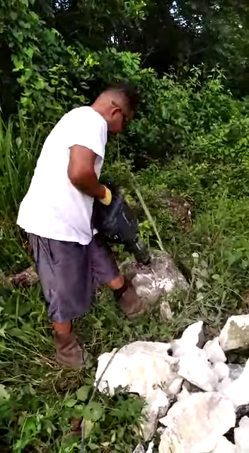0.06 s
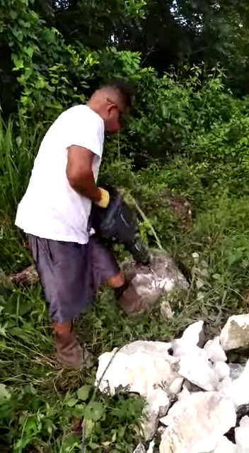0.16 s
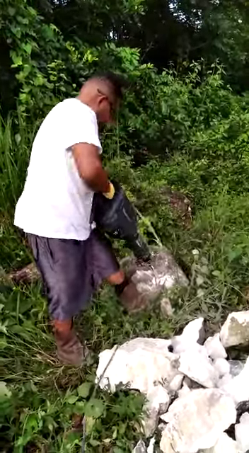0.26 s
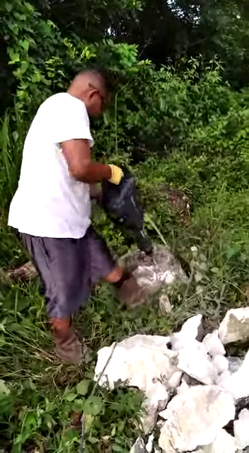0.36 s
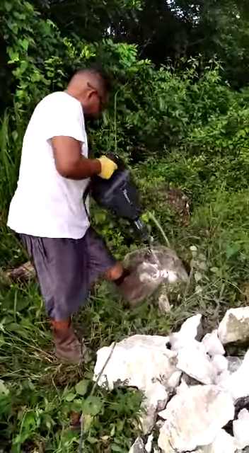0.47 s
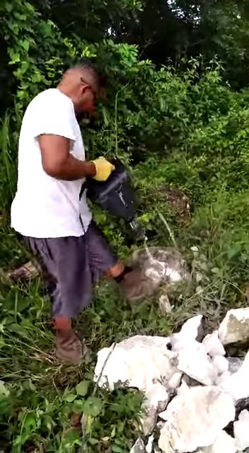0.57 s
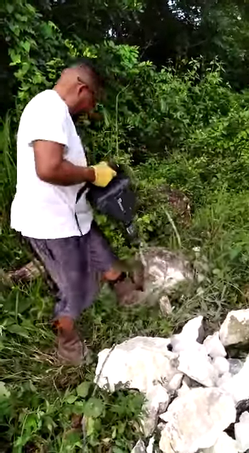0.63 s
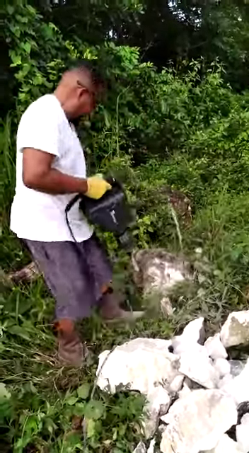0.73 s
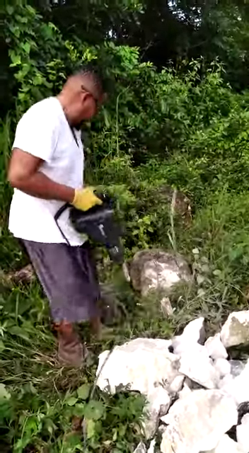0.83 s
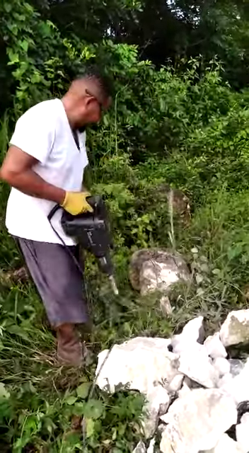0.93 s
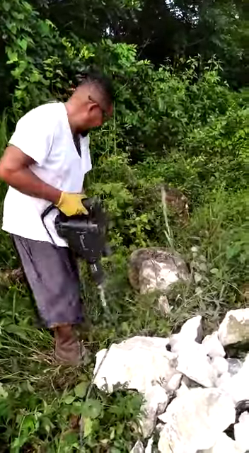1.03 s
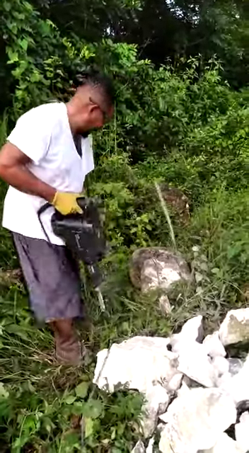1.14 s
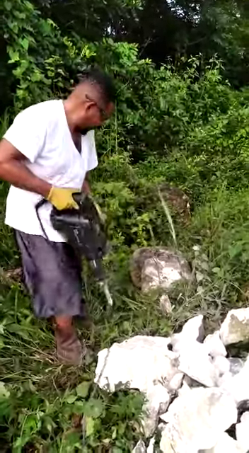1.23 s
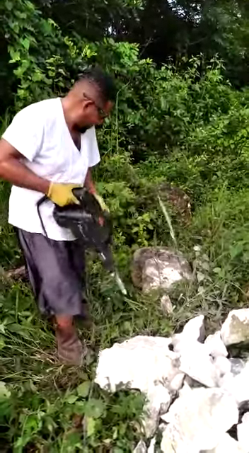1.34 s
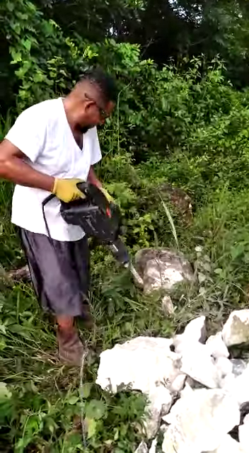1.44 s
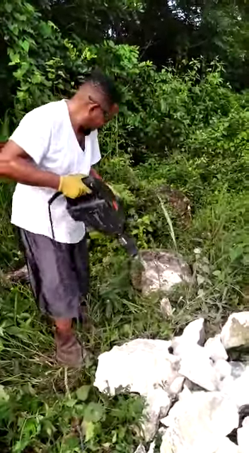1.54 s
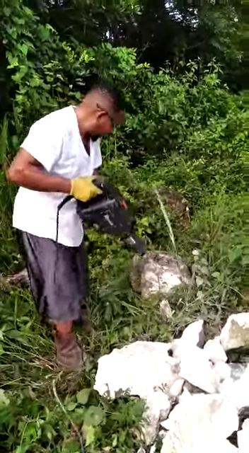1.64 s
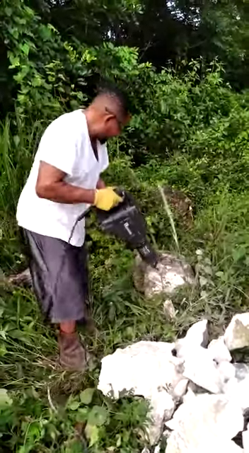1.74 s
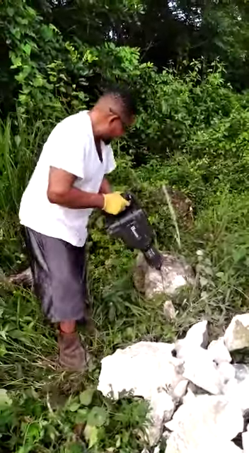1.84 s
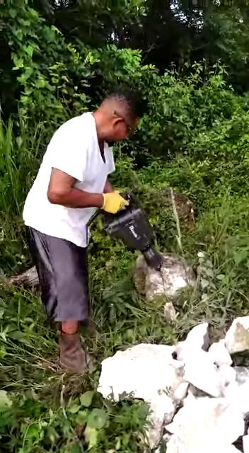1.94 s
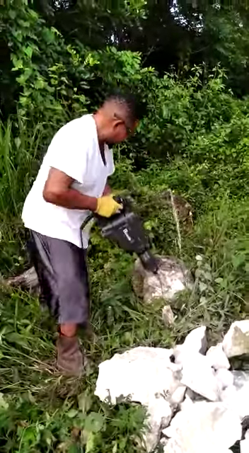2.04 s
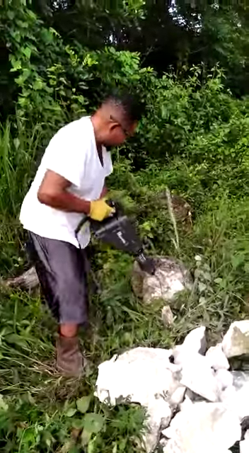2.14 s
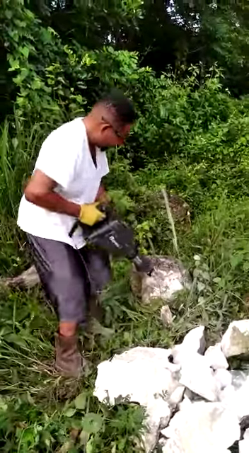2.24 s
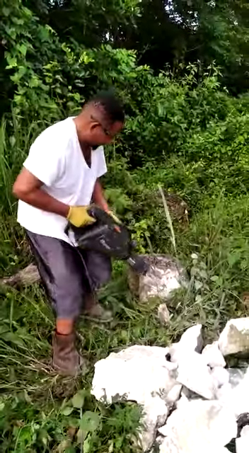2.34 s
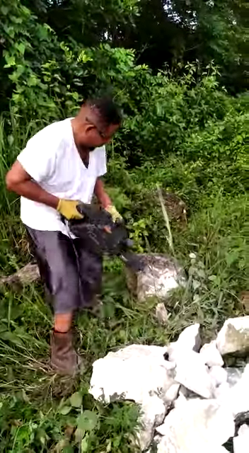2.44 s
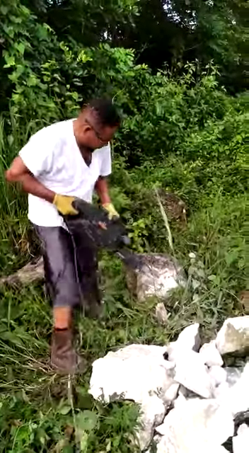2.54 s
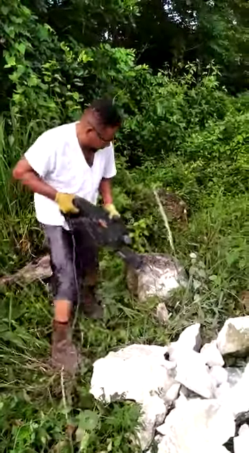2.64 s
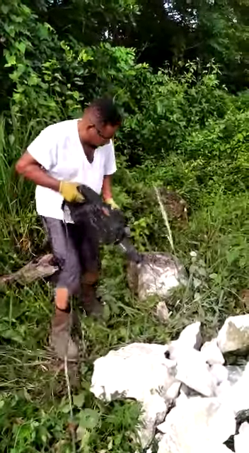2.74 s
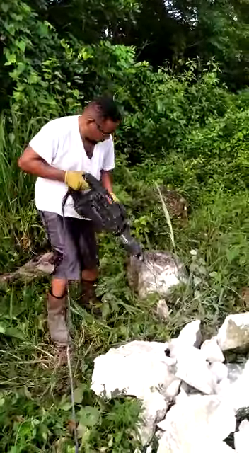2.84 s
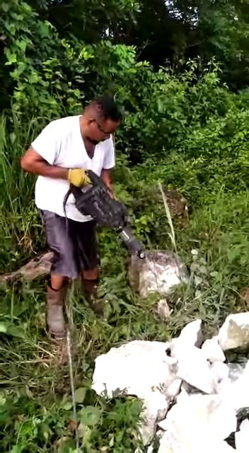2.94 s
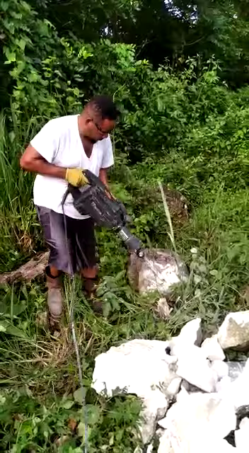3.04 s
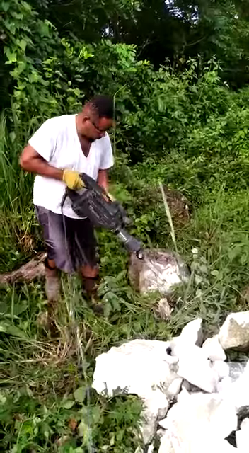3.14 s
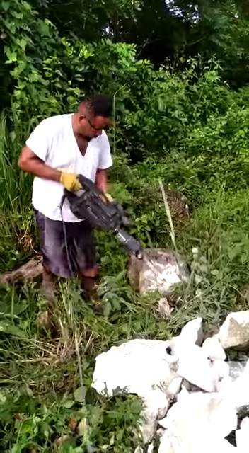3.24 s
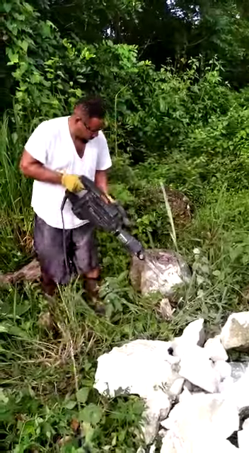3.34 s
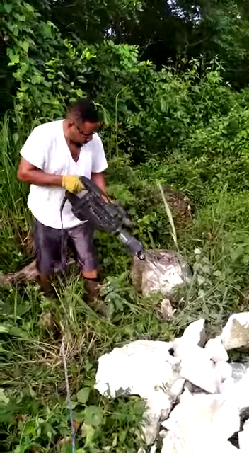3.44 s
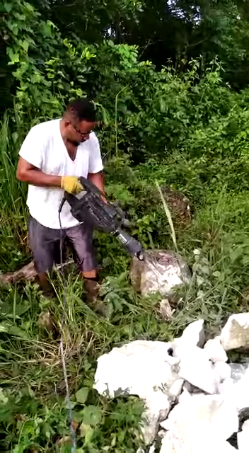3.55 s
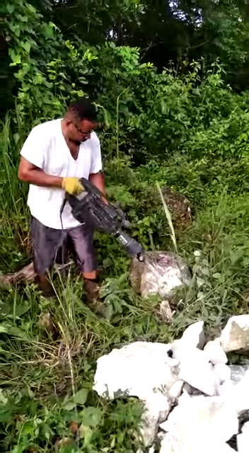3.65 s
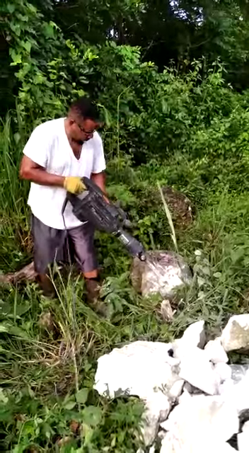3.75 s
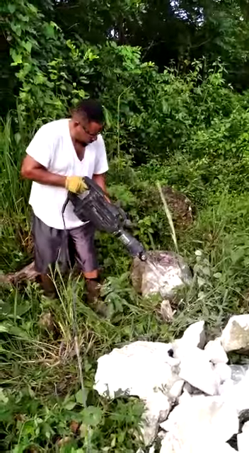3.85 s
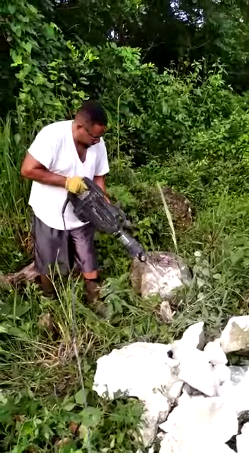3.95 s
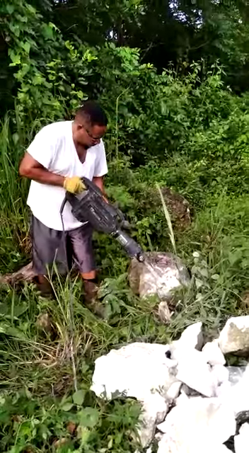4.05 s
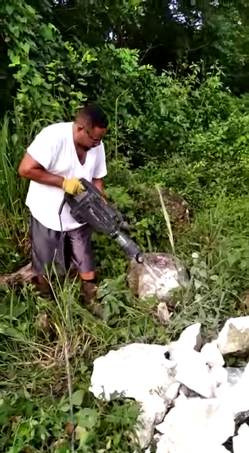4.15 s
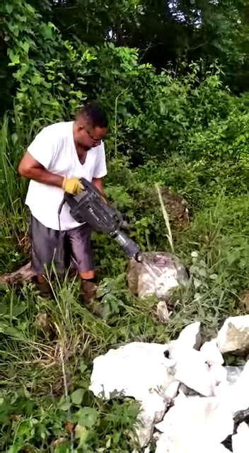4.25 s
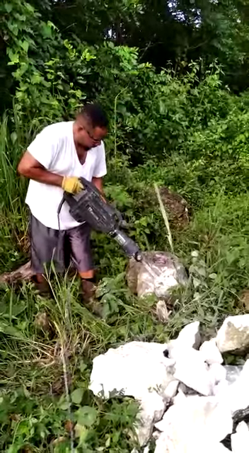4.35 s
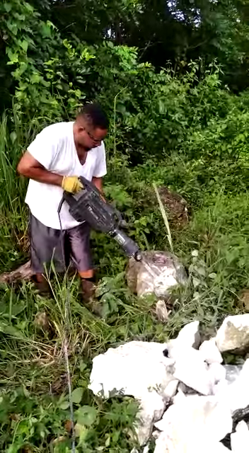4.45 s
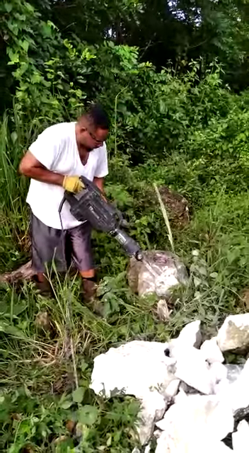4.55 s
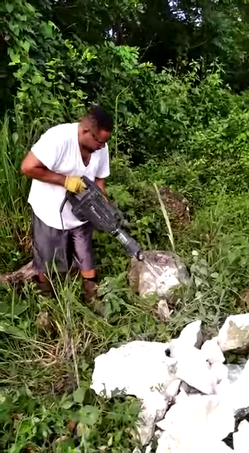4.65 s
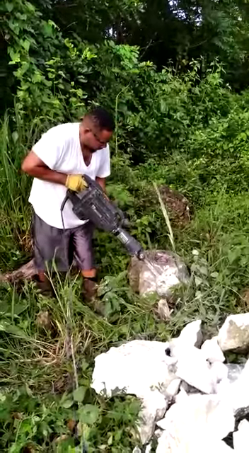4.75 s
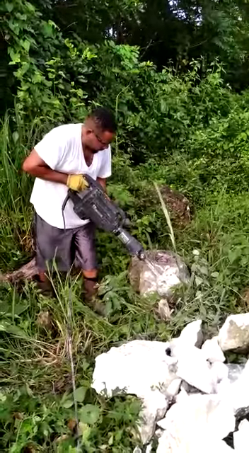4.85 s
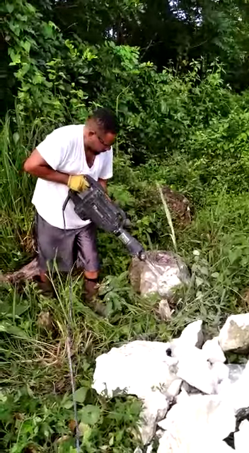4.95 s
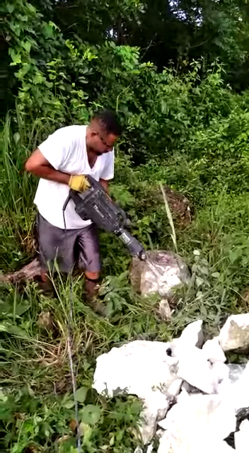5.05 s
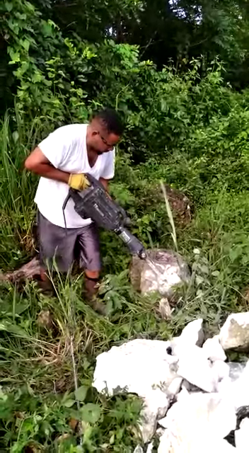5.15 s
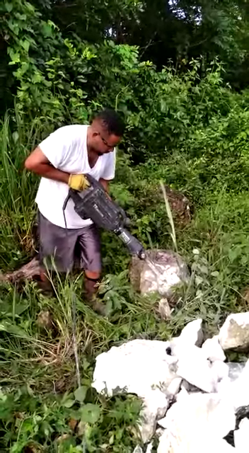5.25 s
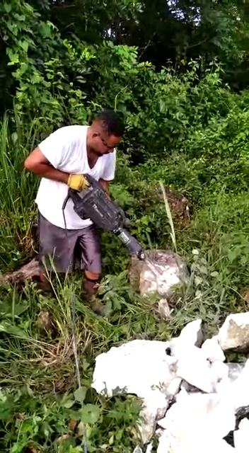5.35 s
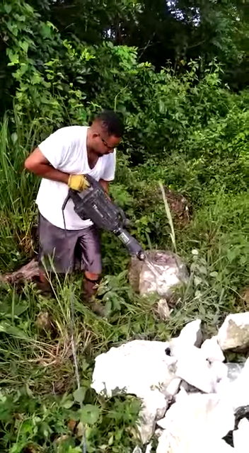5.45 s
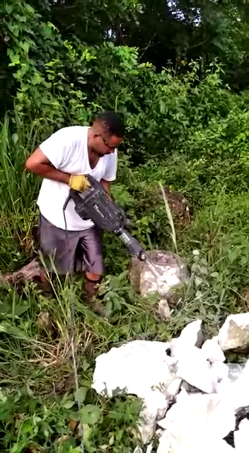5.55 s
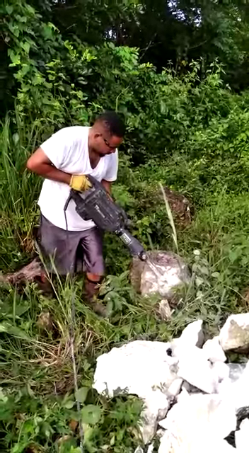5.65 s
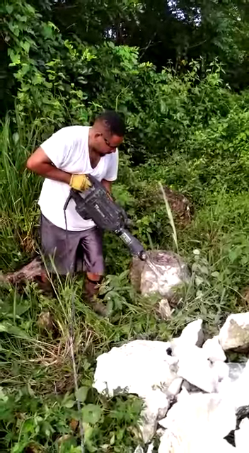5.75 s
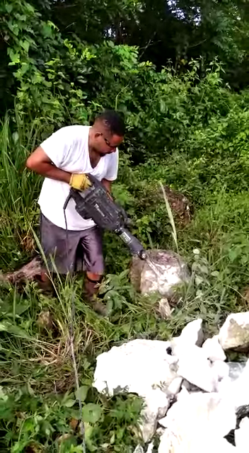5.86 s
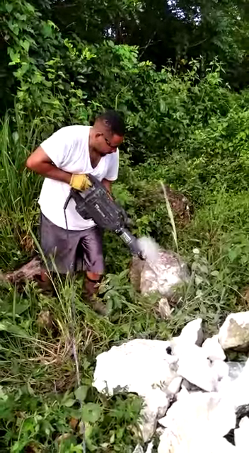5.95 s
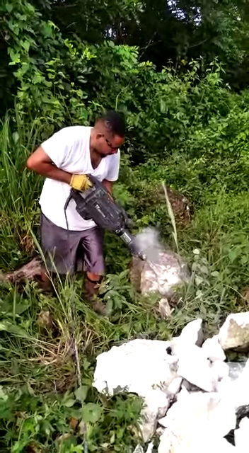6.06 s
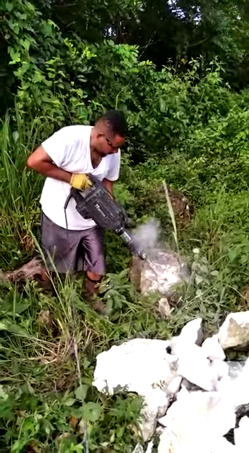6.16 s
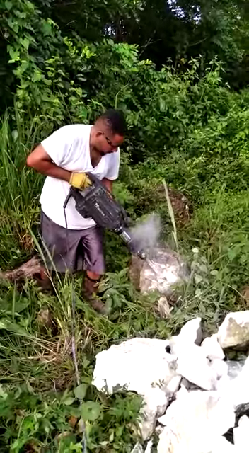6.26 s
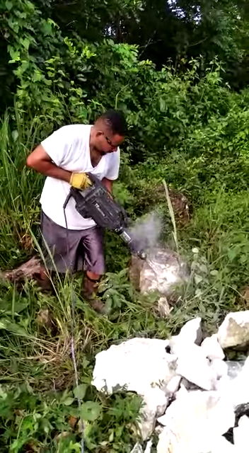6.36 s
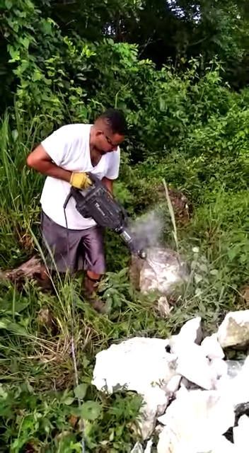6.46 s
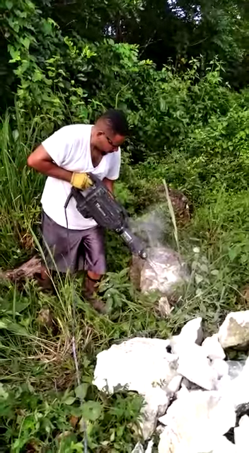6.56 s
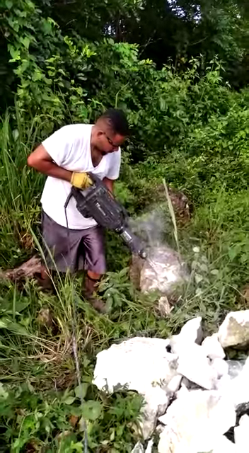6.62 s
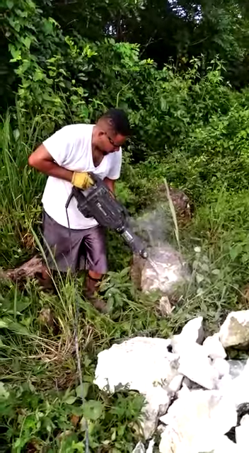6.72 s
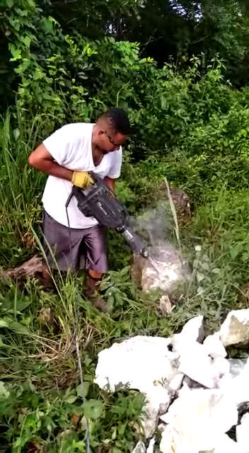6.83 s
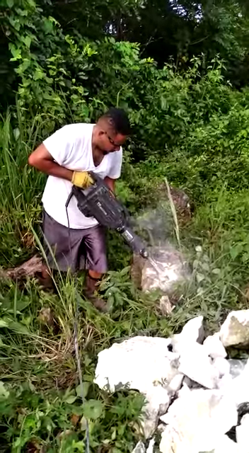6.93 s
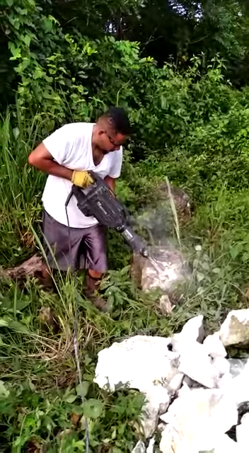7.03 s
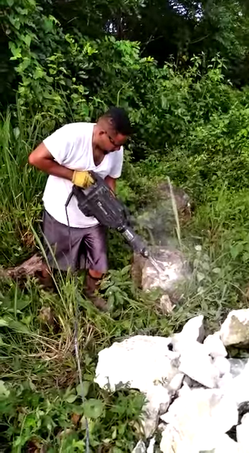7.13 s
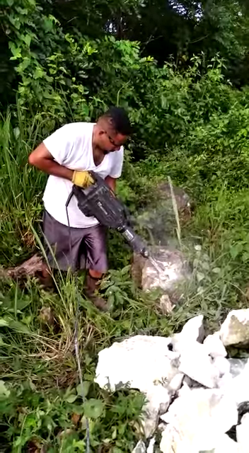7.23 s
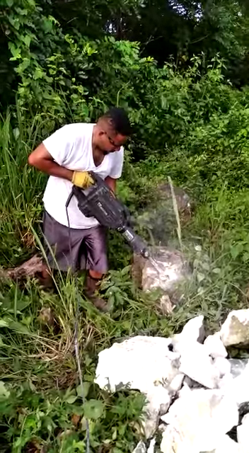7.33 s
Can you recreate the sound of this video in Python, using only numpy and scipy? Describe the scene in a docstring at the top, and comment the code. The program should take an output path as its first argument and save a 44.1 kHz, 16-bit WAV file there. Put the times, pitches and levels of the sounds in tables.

```python
"""Jackhammer on a boulder

An electric jackhammer breaks a boulder in tall grass, with a small generator chugging some way off.
Filtered firing pulses make the engine; shaped noise makes the air and the grass brushed by boots.
Loose chisel knocks sum noise bursts and decaying modes; then the motor winds up to 22 blows a second.
Each blow cracks and rings steel and stone with decaying modes; the stone's note sinks as it splits.
"""
import sys
import numpy as np
from scipy import signal
from scipy.fft import rfft, irfft, next_fast_len
from scipy.io import wavfile
from scipy.ndimage import uniform_filter1d

SR = 44100
rng = np.random.default_rng(int(sys.argv[2]) if len(sys.argv) > 2 else 0)


def bounce(signal):
    """Save signal as a 16-bit WAV file at the path given by the first command-line argument."""
    frames = np.transpose(np.atleast_2d(signal))
    limited = np.clip(frames, -1, 1)
    pcm = np.round(limited * 32767).astype(np.int16)
    wavfile.write(sys.argv[1], SR, pcm)


N = 325899
TIME = np.arange(N) / SR
NOISE_SIZE = next_fast_len(N)  # samples in the long noises
BLOW_SIZE = 4096  # samples in one blow
BLOW_TIME = np.arange(BLOW_SIZE) / SR

# left-right correlation of a diffuse sound [f/Hz, correlation -1..1]
PORT_CORRELATION = [(60, -0.091), (200, 0.79), (500, 0.91), (1200, 0.77), (2500, 0.51), (5000, 0.16),
                    (9000, 0.084), (13000, 0.2)]
# the two microphone ports colour the tool differently [f/Hz, left minus right level/dB]
PORT_LEAN = [(60, 1), (99, -2), (160, 6), (270, -4.5), (450, -1.5), (740, -0.5), (1220, -1.0), (2010, 1),
             (3330, 1.0), (5500, 1), (9080, -0.5), (15000, 0.5)]
EDGE_HZ = 15750  # upper band limit

# generator exhaust, through the tops of its harmonics [f/Hz, relative level/dB]
EXHAUST_SPECTRUM = [(27, -31), (40, -13), (53, 8.5), (80, 8.5), (107, 10.5), (133, 11.5), (160, 10),
                    (187, -1.5), (213, 7.5), (240, 11), (267, -0.5), (293, 7), (380, -11), (700, -40)]
FIRING_HZ = 26.656
# singing panels of the generator [f/Hz, width/Hz, level/dB]
PANEL_MODES = [(1060, 5.2, -67), (1623, 70, -60), (1990, 150, -64), (2405, 90, -62), (2620, 140, -66.5),
               (3200, 95, -75), (3480, 37, -69.5)]
# thin insect tones in the bushes [t/s, f/Hz, level/dB, half length/s]
INSECT_TONES = [(1.62, 9130, -54, .22), (1.35, 10330, -59, .3), (0.15, 8950, -58, .3)]
# faint air [f/Hz, relative level/dB]
AIR_SPECTRUM = [(260, -8.5), (450, -4), (700, -15.5), (950, -9), (1300, -19), (1700, 0), (2900, -30),
                (3200, -26), (4400, -17.5), (6400, -28), (7800, -21.5), (8900, -10), (11000, -19),
                (15500, -30)]

# knocks of the loose chisel on the stone [t/s, clack level/dB, steel jangle level/dB, dull thud level/dB]
CHISEL_KNOCKS = [(0.3954, -16, -11, -19), (.458, -29.5, -26, -31.5), (0.5478, -49, -30.5, -34),
                 (1.733, -56, -39, -35), (1.78, -8.5, -7, -23), (1.792, -16, -4, -15.5),
                 (1.801, -8.5, -14, -17), (1.811, -22, -4, -25), (1.828, -10.5, -5.5, -20),
                 (1.889, -30, -31, -27), (1.928, -45, -17, -28.5), (2.015, -27, -34, -28.5),
                 (2.107, -27.5, -24.5, -58), (2.124, -37, -35, -75), (2.627, -17, -9.5, -21),
                 (2.662, -19.5, -37, -27), (2.727, -26, -32, -59)]
# chisel hanging loose [f/Hz, relative level/dB, t60/s]
CHISEL_MODES = [(4580, -6, .25), (6700, -12, 0.48), (7100, -8, 0.51), (9480, 4.5, 0.47), (9300, -48, 0.25),
                (10200, -29, .5), (12400, -21, .6), (14560, -12, .15)]
# the boulder's dull body [f/Hz, relative level/dB, t60/s]
BOULDER_MODES = [(483, -11, 0.11), (604, -1, 0.041), (823, -11.5, 0.099), (1166, 0.5, 0.023),
                 (1280, -7.5, 0.077), (1597, 3, 0.018), (1724, -9.5, 0.1), (2460, -24, 0.034),
                 (3110, -19, 0.062)]
# dry clack of stone [f/Hz, relative level/dB]
CLACK_SPECTRUM = [(150, -39), (330, -15), (520, -4.5), (800, 0.5), (1400, -0.5), (2400, 1.5), (3500, -0.5),
                  (5000, 0.5), (8000, -14.5), (15000, -32)]
# jangle of the shank in its holder [f/Hz, relative level/dB]
JANGLE_SPECTRUM = [(1500, -28), (5000, -13.5), (7000, -2.5), (8200, -1), (9350, 6), (10800, -13),
                   (13000, -9), (15700, -31)]

# legs brushing through grass [t of the peak/s, level/dB, rise/s, fall/s]
GRASS_SWISHES = [(.69, -26.5, 0.046, 0.12), (.86, -18, 0.11, 0.09), (2.3, -28.5, 0.036, 0.053),
                 (2.52, -22, 0.11, 0.087), (2.79, -14.5, 0.05, 0.16), (3.01, -19.5, .06, 0.12)]
# sliding blades of grass [f/Hz, relative level/dB]
BLADE_SPECTRUM = [(710, -44), (1200, -35), (1350, -23), (1490, -28), (2070, -23), (2260, -27), (2920, -22),
                  (3220, -24.5), (4200, -20), (6590, -11), (9190, 3.5), (11000, -8), (15500, -11)]
SWISH_SHAPE = 1.37  # exponent: 1 = pointed, 2 = bell

# motor, fan and rattling gears under load [t/s, level/dB]
MOTOR_LEVELS = [(3.38, -17.5), (3.55, -15), (3.75, -13), (4.5, -11.5), (5.5, -11.5), (7.39, -9.5)]
# fan rush [f/Hz, relative level/dB]
FAN_SPECTRUM = [(30, -30), (80, -18.5), (220, -33.5), (480, -7), (700, -8.5), (1300, -5), (1900, -6.5),
                (2550, -4), (3100, -4), (6300, -4), (7600, -0.5), (9300, 2), (10800, -8.5), (12600, -4.5),
                (14000, -12.5), (15700, -19)]
# resonances of the gear housing, against the fan rush [f/Hz, width/Hz, level/dB]
HOUSING_MODES = [(477, 105, -25), (1255, 150, -25), (2520, 290, -17.5), (4030, 250, -22), (6230, 60, -20),
                 (7790, 140, -19), (8950, 86, -14), (9730, 160, -23), (11970, 91, -24), (12700, 200, -19),
                 (13100, 140, -32)]
# the piston groans on its first slow strokes [t of the peak/s, f/Hz, level/dB, half length/s]
PISTON_GROANS = [(3.287, 499.5, -31, 0.021), (3.337, 457, -15.5, 0.012), (3.395, 493, -30, 0.016),
                 (3.43, 532, -19, 0.0053)]
SWITCH_ON_S, SPIN_UP_S = 3.262, .034
# the motor grows louder through each compression, the more so the longer the stroke
LABOUR_DB_PER_S = 63
# the motor whines briefly as it takes current
WHINE_HZ, WHINE_DB, WHINE_T60_S = 2620, -27.5, .35

# the slow opening blows [t/s]
OPENING_BLOWS = [3.346, 3.441, 3.5095, 3.574, 3.6328]
# full speed, creeping up with one brief dip near 6.5 s [t/s, blows per second]
FULL_SPEED = [(4.6, 22.238), (5.3, 22.334), (6.2, 22.403), (6.55, 22.004), (6.9, 22.70)]
SPEED_DEFICIT, WIND_UP_S = .1618, .223  # fraction short of full speed at first, and its time constant
# the stone under the chisel [t/s, note f/Hz, note level/dB, ground thump level/dB]
STONE_STATES = [(3.3, 1030, -33, -40), (3.901, 1070, -12, -30.5), (4.4, 1024, -10, -33),
                (4.8, 967, -8, -24.5), (5.5, 963, -4.5, -19), (5.9, 918, -2, -28), (6.25, 869, 1.5, -20),
                (6.601, 845, 2, -34.5), (6.85, 822, 3, -29), (7.05, 750, 0, -20), (7.15, 662, -5, -22),
                (7.39, 630, -1, -25)]
# as the tip digs in, the crash grows and the steel rings less
# [t/s, crash level/dB, chisel ring level/dB, upper ring level/dB, piston squeak level/dB]
DIGGING_LEVELS = [(3.35, -2.5, 0, -8, -37), (3.55, -4.5, -9, -7, -10.5), (4.45, -3, -3.5, -3.5, -5.5),
                  (4.85, -1.5, -7, -6, -14), (5.3, 1, -8.5, -10.5, -18), (6.1, 0.5, -13, -12, -10),
                  (6.45, 1.5, -19, -16, -5), (6.78, 2, -9, -10, -6.5), (7.0, 1, -25, -8, -22),
                  (7.39, 3, -18, -11, -12)]
# spells in which the chisel bounces clear and rings freely [middle t/s, half length/s, freedom 0..1]
FREE_SPELLS = [(3.43, 0.15, 0.99), (5.132, .05, 0.64), (5.343, 0.045, 0.57), (5.897, 0.04, 0.99),
               (6.351, 0.091, 0.84), (6.569, 0.0427, 1), (6.725, .02, 0.53), (7.332, 0.11, 0.82)]
# spells in which the tip jams in a crack
# [middle t/s, half length/s, tip f/Hz, tip ring level/dB, clank level of the loosening slab/dB]
JAMMED_SPELLS = [(6.166, 0.12, 5500, -8, -22), (6.92, .09, 5880, -9.5, -2.5),
                 (7.12, .11, 5750, -12.5, -0.5)]
# crash of steel on stone [f/Hz, relative level/dB]
CRASH_SPECTRUM = [(150, -40), (450, -5.5), (800, -5), (1300, -14), (2000, -8), (3000, -7), (4200, -6),
                  (6200, -0.5), (7300, 1), (9500, 6.5), (10900, -5.5), (12600, -3), (13700, -16),
                  (15700, -18.5)]
CONTACT_MEMORY = .7  # likeness of one crash to the next, 0..1
# standard deviations from blow to blow
CRASH_SPREAD_DB, RING_SPREAD_DB, UPPER_SPREAD_DB, SQUEAK_SPREAD_DB = 1.5, 2, 3.5, 4
RING_SPREAD_HZ, OVERTONE_SPREAD_DB = 140, 2
RING_RISE_S = .0015
PRESSED_HZ, FREE_HZ, FREE_RING_DB, FREE_UPPER_DB = 7544, 6963, 5, 4.5
# the shank chatters in its holder, less so when it is free
CHATTER_DB, FREE_CHATTER_DB = 2, -8.5
# the steel's highest mode
OVERTONE_HZ, OVERTONE_WIDTH_HZ, OVERTONE_T60_S = 14630, 400, .085
# the seal also chirps more weakly on the way up, at an uncertain moment
EARLY_SQUEAK_DB, EARLY_SQUEAK_S, EARLY_SPREAD_S = -6.5, .014, .005


def amp(db):
    """Level and amplitude: 20 dB is a factor of ten in gain."""
    return 10 ** (np.asarray(db) / 20)


def unit(x):
    """Normalisation of a signal to rms 1."""
    return x / np.sqrt(np.mean(x ** 2) + 1e-20)


def read(points, hz):
    """Linear interpolation of a spectrum on a log-frequency axis."""
    f, value = np.transpose(points)
    return np.interp(np.log(hz + 1), np.log(f + 1), value)


def correlation(hz):
    """Spatial coherence: the left-right correlation at a frequency."""
    return np.clip(read(PORT_CORRELATION, hz), -1, 1)


def add(mix, s, sound):
    """Superposition: a sound joins the mix at time s."""
    part = mix[:, max(round(s * SR), 0):][:, :sound.shape[-1]]
    part += sound[..., :part.shape[1]]


def noise(spectrum, size):
    """Spectral shaping: stereo noise of rms 1, its left-right correlation set by frequency."""
    hz = np.fft.rfftfreq(size, 1 / SR)
    mid, side = rfft(rng.standard_normal((2, size)))
    same = correlation(hz)
    mid, side = mid * np.sqrt(1 + same), side * np.sqrt(1 - same)
    return unit(irfft(np.array([mid + side, mid - side]) * amp(read(spectrum, hz)), size))


def wander(hz, size):
    """Low-pass random process of rms 1, moving at up to about hz."""
    f = np.fft.rfftfreq(size, 1 / SR)
    return unit(irfft(rfft(rng.standard_normal(size)) * np.exp(-(f / hz) ** 2), size))


def strike(t, rise, t60):
    """Struck-body envelope: a quick rise, then an exponential decay of 60 dB in t60."""
    return (1 - np.exp(-t / rise)) * np.exp(-np.log(1000) * t / t60)


def ring(t, hz, fuzz, width_hz):
    """Phase modulation: a mode of rms 1 roughened by random phase, offset between the ports."""
    phase = 2 * np.pi * (hz * t + rng.random())
    # two sines a phase angle apart correlate as its cosine
    apart = np.arccos(correlation(hz)) * rng.choice([-1, 1])
    channels = [np.sin(phase + lag + fuzz * wander(width_hz, len(t))) for lag in (0, apart)]
    return np.sqrt(2) * np.array(channels)


def fuzzy(size, hz, width_hz):
    """Damped resonance: noise of rms 1 in a narrow band, partly alike at the two ports."""
    f = np.fft.rfftfreq(size, 1 / SR)
    band = 1 / (1 + (2 * (f - hz) / width_hz) ** 2)
    mid, side = irfft(rfft(rng.standard_normal((2, size))) * band, size)
    same = correlation(hz)
    mid, side = mid * np.sqrt(1 + same), side * np.sqrt(1 - same)
    return unit(np.array([mid + side, mid - side]))


def resonances(table):
    """Modal sum: steady noise rings in a set of resonances, each wavering a little in level."""
    return sum(amp(db + 1.44 * wander(1.9, NOISE_SIZE)) * fuzzy(NOISE_SIZE, hz, width)
               for hz, width, db in table)


def generator():
    """Periodic excitation: each firing pulses through the muffler, whose deepest notes come out late."""
    firings = np.arange(.0103 - 2 / FIRING_HZ, TIME[-1], 1 / FIRING_HZ)
    hz = np.fft.rfftfreq(16384, 1 / SR)
    log_gain = np.log(amp(read(EXHAUST_SPECTRUM, hz)) / (1 + (hz / 900) ** 4) + 1e-6)
    # the Hilbert transform of the log gain gives the minimum-phase response
    causal = np.conj(signal.hilbert(np.r_[log_gain, log_gain[-2:0:-1]]))[:len(hz)]
    lag = 0.0392 * np.exp(-(hz / 85) ** 2)  # group delay, s
    late = 2 * np.pi * np.cumsum(lag) * hz[1]
    puff = irfft(np.exp(causal - 1j * late))[:6144]
    out = np.zeros((2, N + SR))
    for s in firings:
        add(out, s + 1, amp(.5 * rng.standard_normal()) * puff)  # a second of lead-in, cut below
    return amp([[-44.8], [-46.2]]) * unit(out[:, SR:])


def outdoors():
    """Amplitude modulation: engine panels throb at the firing rate, over faint air and insect tones."""
    throb = 1 + .14 * np.cos(2 * np.pi * FIRING_HZ * (TIME - .018))
    panels = throb * resonances(PANEL_MODES)[:, :N]
    air = amp(-53) * noise(AIR_SPECTRUM, NOISE_SIZE)[:, :N]
    insects = np.zeros((2, N))
    for s, hz, db, half in INSECT_TONES:
        swell = np.exp(-((TIME - s) / half) ** 2)
        insects += amp(db) * fuzzy(NOISE_SIZE, hz, width_hz=72)[:, :N] * swell
    return panels + insects + air


def modes(t, table, fuzz, width_hz, rise):
    """Modal decay: a struck body sounds as the sum of its dying modes."""
    return sum(amp(db) * ring(t, hz, fuzz, width_hz) * strike(t, rise, t60) for hz, db, t60 in table)


def knocks():
    """Impact: a dry clack and thud of stone, a jangle of the shank, then the free steel rings on."""
    out, t = np.zeros((2, N)), np.arange(32768) / SR
    # each envelope has a fast decay and a faint slow tail
    clack_shape = strike(t, rise=0.00046, t60=0.057) + amp(-19.5) * strike(t, rise=0.0078, t60=0.68)
    jangle_shape = strike(t, rise=0.0015, t60=0.071) + amp(-21) * strike(t, rise=0.0048, t60=0.61)
    for s, clack_db, steel_db, thud_db in CHISEL_KNOCKS:
        clatter = unit(amp(1.3 * wander(160, len(t))))
        clack = clack_shape * clatter * noise(CLACK_SPECTRUM, len(t))
        jangle = jangle_shape * clatter * noise(JANGLE_SPECTRUM, len(t))
        steel = modes(t, CHISEL_MODES, fuzz=3.6, width_hz=23, rise=.001)
        thud = modes(t, BOULDER_MODES, fuzz=.3, width_hz=90, rise=.0008)
        add(out, s, amp(clack_db) * clack)
        add(out, s, amp(steel_db) * (jangle + amp(-19.5) * steel))
        add(out, s, amp(thud_db) * thud)
    return out


def grass():
    """Friction: blades slide over boots and cloth in a fine grainy hiss that swells with each step."""
    power = np.zeros(N)
    for s, db, rise, fall in GRASS_SWISHES:
        span = np.where(TIME < s, rise, fall)
        swish = amp(db) * np.exp(-abs((TIME - s) / span) ** SWISH_SHAPE)
        power += swish ** 2
    grain = unit(amp(1.6 * wander(900, NOISE_SIZE) + 0.81 * wander(50, NOISE_SIZE)))
    return np.sqrt(power) * (grain * noise(BLADE_SPECTRUM, NOISE_SIZE))[:, :N]


def blow_times():
    """Exponential approach: one blow a stroke, at a rate that closes in on full speed."""
    times = list(OPENING_BLOWS)
    while times[-1] < TIME[-1]:
        s = times[-1]
        shortfall = SPEED_DEFICIT * np.exp((OPENING_BLOWS[-1] - s) / WIND_UP_S)
        rate = np.interp(s, *np.transpose(FULL_SPEED)) * (1 - shortfall)
        times.append(s + 1 / rate)
    return np.array(times)


def motor_level():
    """Load: the motor spins up, swells through each compression and eases after the blow."""
    edges = np.r_[SWITCH_ON_S, blow_times()]
    stroke = np.clip(np.searchsorted(edges, TIME), 1, len(edges) - 1)
    mid_stroke = (edges[stroke - 1] + edges[stroke]) / 2
    labour_db = LABOUR_DB_PER_S * np.maximum(TIME - mid_stroke, -1)
    level_db = np.interp(TIME, *np.transpose(MOTOR_LEVELS)) + uniform_filter1d(labour_db, size=300)
    spin = 1 - np.exp(-np.maximum(TIME - SWITCH_ON_S, 0) / SPIN_UP_S)
    return spin * amp(level_db)


def motor():
    """Forced resonance: fan rush and gritty gear rattle ring the housing; whine and groans at the start."""
    rattle = unit(amp(1.56 * wander(730, NOISE_SIZE) + 0.5 * wander(58, NOISE_SIZE)))
    rush = noise(FAN_SPECTRUM, NOISE_SIZE) * amp(-1.34) + resonances(HOUSING_MODES)
    out = motor_level() * (rattle * rush)[:, :N]
    t = np.arange(16384) / SR
    whine = ring(t, WHINE_HZ, fuzz=0.87, width_hz=150) * strike(t, rise=0.0051, t60=WHINE_T60_S)
    add(out, SWITCH_ON_S, amp(WHINE_DB) * whine)
    t = np.arange(4096) / SR
    for s, hz, db, half in PISTON_GROANS:
        swell = np.exp(-((t - t.mean()) / half) ** 2)
        add(out, s - t.mean(), amp(db) * swell * ring(t, hz, fuzz=.25, width_hz=80))
    return out


def stone_at(s):
    """Interpolation of the stone's note pitch, note level and ground thump level at time s."""
    times, *columns = np.transpose(STONE_STATES)
    return [np.interp(s, times, column) for column in columns]


def spell(s, middle, half):
    """Soft-edged window: near 1 during a spell, falling to 0 outside it."""
    return np.exp(-abs((s - middle) / half) ** 4)


def blows():
    """Boundary damping: a free chisel rings lower, louder and cleaner than one pressed into the stone."""
    s = blow_times()[:-1]
    times, *columns = np.transpose(DIGGING_LEVELS)
    crash_db, ring_db, upper_db, squeak_db = [np.interp(s, times, column) for column in columns]
    free = np.clip(sum(freedom * spell(s, middle, half) for middle, half, freedom in FREE_SPELLS), 0, 1)
    pressed = 1 - free
    crash, pitch, loudness, upper, squeak = rng.standard_normal((len(s), 5)).T
    crash_db = crash_db + CRASH_SPREAD_DB * crash
    ring_hz = free * FREE_HZ + pressed * (PRESSED_HZ + RING_SPREAD_HZ * pitch)
    ring_db = free * FREE_RING_DB + pressed * (ring_db + RING_SPREAD_DB * loudness)
    upper_db = free * FREE_UPPER_DB + pressed * (upper_db + UPPER_SPREAD_DB * upper)
    chatter_db = free * FREE_CHATTER_DB + pressed * CHATTER_DB
    squeak_db = squeak_db + SQUEAK_SPREAD_DB * squeak
    return zip(s, crash_db, ring_hz, ring_db, upper_db, chatter_db, squeak_db)


def piston_squeaks(out, s, squeak_db):
    """Flow noise: air squeezed past the piston seal chirps just before the striker lands."""
    early_s = EARLY_SQUEAK_S + EARLY_SPREAD_S * rng.standard_normal()
    for early, db in [(0, 0), (early_s, EARLY_SQUEAK_DB)]:
        squeak = fuzzy(BLOW_SIZE, 12550 + 170 * rng.standard_normal(), width_hz=890)
        swell = np.exp(-((BLOW_TIME - .0135) / 0.0032) ** 2)
        add(out, s - early - .018, amp(squeak_db + db) * squeak * swell)


def crack_and_crash(contact, crash_db):
    """Impact noise: a short crack of stone over the longer crash of steel."""
    crash = contact * strike(BLOW_TIME, rise=0.00045, t60=0.076)
    crack = noise(CLACK_SPECTRUM, BLOW_SIZE) * strike(BLOW_TIME, rise=0.00032, t60=0.011)
    return amp(crash_db) * crash + amp(crash_db - 5.0) * crack


def chisel_ring(ring_hz, ring_db, upper_db, chatter_db):
    """Modes of a struck bar: chatter of the shank in its holder roughens the two main rings."""
    t, size = BLOW_TIME, BLOW_SIZE
    main = ring(t, ring_hz, fuzz=.45, width_hz=250)
    main += amp(chatter_db) * fuzzy(size, ring_hz, width_hz=900)
    upper = ring(t, 9380, fuzz=.9, width_hz=200)
    upper += amp(chatter_db) * fuzzy(size, 9530, width_hz=6000)
    overtone_db = -11.5 + 0.18 * ring_db + OVERTONE_SPREAD_DB * rng.standard_normal()
    overtone = fuzzy(size, OVERTONE_HZ, OVERTONE_WIDTH_HZ) * strike(t, rise=0.0016, t60=OVERTONE_T60_S)
    steel = amp(ring_db) * main * strike(t, rise=RING_RISE_S, t60=0.077)
    steel += amp(upper_db) * upper * strike(t, rise=0.0037, t60=0.075)
    steel += amp(overtone_db) * overtone
    steel += amp(-32) * fuzzy(size, 8900, width_hz=280) * strike(t, rise=.002, t60=0.056)
    return steel


def jammed_tip(s):
    """Coupled bodies: the tip jammed in a crack rings lower, and the loosening slab clanks."""
    t, out = BLOW_TIME, np.zeros((2, BLOW_SIZE))
    for middle, half, tip_hz, tip_db, slab_db in JAMMED_SPELLS:
        if abs(s - middle) < half:
            tip = ring(t, tip_hz, fuzz=0.73, width_hz=220) * strike(t, rise=0.00062, t60=0.11)
            slab = ring(t, 3800, fuzz=1.4, width_hz=290) * strike(t, rise=0.0032, t60=0.041)
            out += amp(tip_db) * tip + amp(slab_db) * slab
    return out


def stone_ring(s):
    """Stress-dependent pitch: the cracked stone's note starts sharp and relaxes with the pressure."""
    t = BLOW_TIME
    stone_hz, stone_db, ground_db = stone_at(s)
    relaxing = t + 0.00048 * (1 - np.exp(-t / 0.0048))
    note = np.sin(2 * np.pi * stone_hz * relaxing) * strike(t, rise=.008, t60=.04)
    under = fuzzy(BLOW_SIZE, stone_hz * 0.69, width_hz=190) * strike(t, rise=0.003, t60=0.047)
    # the boulder rocks in its bed with a dull bump
    bump = fuzzy(BLOW_SIZE, 177, width_hz=1100) * strike(t, rise=0.0028, t60=0.063)
    return amp(stone_db) * note + amp(stone_db - 13.0) * under + amp(ground_db) * bump


def hammer():
    """Repeated impact: squeak of the piston, crack, crash of steel, ringing chisel and stone."""
    out, contact = np.zeros((2, N)), noise(CRASH_SPECTRUM, BLOW_SIZE)
    for s, crash_db, ring_hz, ring_db, upper_db, chatter_db, squeak_db in blows():
        # the tip stays in its pit, so each crash resembles the one before
        fresh = np.sqrt(1 - CONTACT_MEMORY ** 2) * noise(CRASH_SPECTRUM, BLOW_SIZE)
        contact = CONTACT_MEMORY * contact + fresh
        blow = crack_and_crash(contact, crash_db)
        blow += chisel_ring(ring_hz, ring_db, upper_db, chatter_db)
        blow += jammed_tip(s) + stone_ring(s)
        add(out, s, blow)
        piston_squeaks(out, s, squeak_db)
    return out


def thumps():
    """Action and reaction: the ground takes each blow, and the housing kicks back about half a stroke on."""
    out, t = np.zeros((2, N)), np.arange(-1024, 1024) / SR
    for s in blow_times()[:-1]:
        ground_db = stone_at(s)[-1]
        for delay, db in [(.003, -9), (.0255, -11.5)]:
            chance_db = 2.5 * rng.standard_normal()
            # pitch and moment differ at the two ports
            hz = 92 * (1 + 0.2 * rng.standard_normal((2, 1)))
            skewed = t - .0012 * rng.standard_normal((2, 1))
            push = np.sin(2 * np.pi * hz * skewed) * np.exp(-(skewed / 0.013) ** 2)
            add(out, s + delay + t[0], amp(ground_db + db + chance_db) * push)
    return out * amp([[1.5], [-1.5]])


def ports(x):
    """Receiver response: each microphone port favours its own bands."""
    lean_db = read(PORT_LEAN, np.fft.rfftfreq(NOISE_SIZE, 1 / SR))
    gain = amp(np.array([lean_db, -lean_db]) / 2)
    return irfft(rfft(x, NOISE_SIZE) * gain, NOISE_SIZE)[:, :N]


def reflect(x):
    """Early reflection: ground and nearby rubble return faint echoes, different at each port."""
    out = x.copy()
    # channel, delay/s, level/dB
    for channel, delay, db in [(0, .0021, -39), (1, 0.0026, -15), (0, .0056, -20.5), (1, 0.0057, -26)]:
        lag = int(delay * SR)
        out[channel, lag:] += amp(db) * x[channel, :N - lag]
    return out


def scene():
    """Superposition of generator, open air, grass and tool."""
    tool = reflect(ports(hammer() + motor()) + knocks()) + thumps()
    return generator() + outdoors() + grass() + tool


def record(dry):
    """Dynamic compression: a fast limiter holds the loudest peaks, which round off before a band limit."""
    peak_db = 20 * np.log10(abs(dry).max(0) + 1e-6)
    recovery = TIME * 160  # dB, at 160 dB/s
    held_peak_db = np.maximum.accumulate(peak_db + recovery) - recovery
    over_db = np.maximum(held_peak_db - 5, 0)
    held = dry * amp(-uniform_filter1d(over_db, size=60))
    rounded = held / (1 + (abs(held) / .95) ** 6) ** (1 / 6)
    low_pass = signal.firwin(511, EDGE_HZ, window=("kaiser", 8), fs=SR)
    return signal.oaconvolve(rounded, low_pass[None], "same")


dry = scene()
out = record(dry)
bounce(out)
```